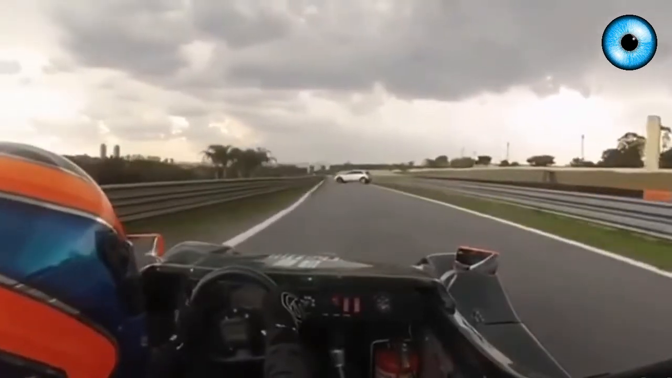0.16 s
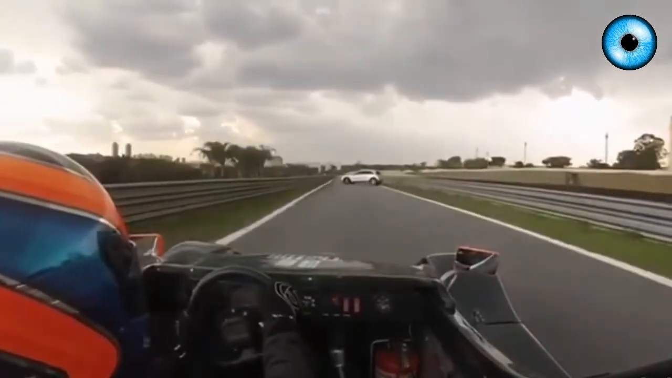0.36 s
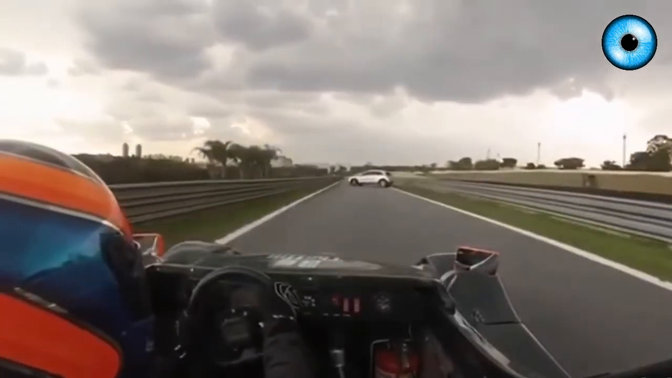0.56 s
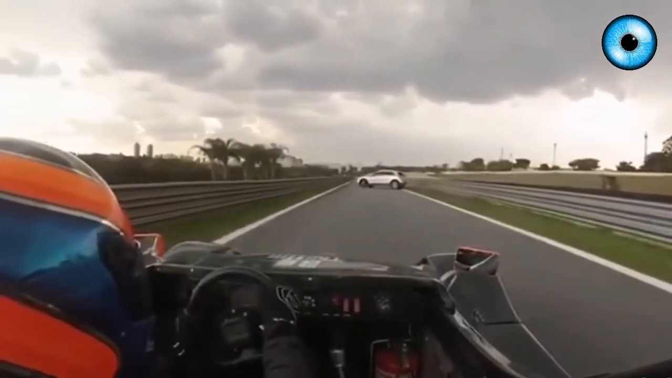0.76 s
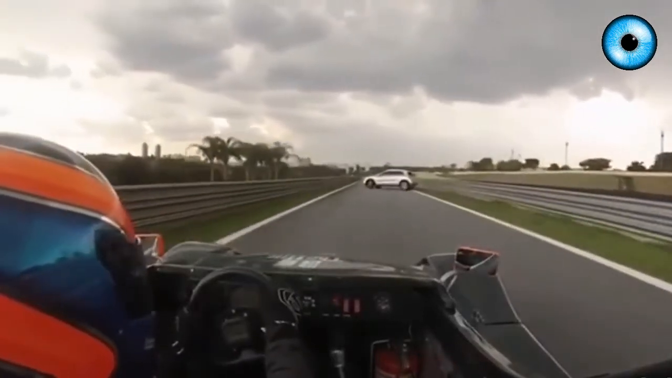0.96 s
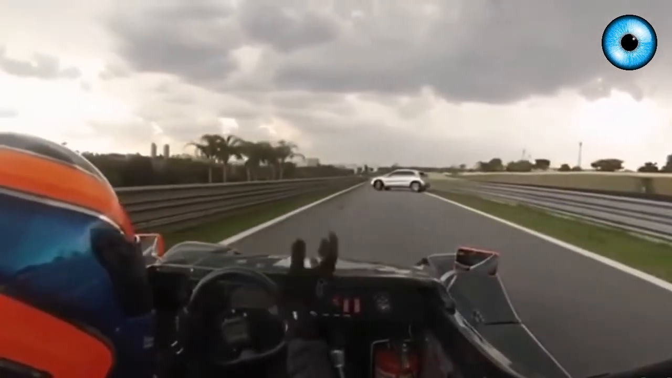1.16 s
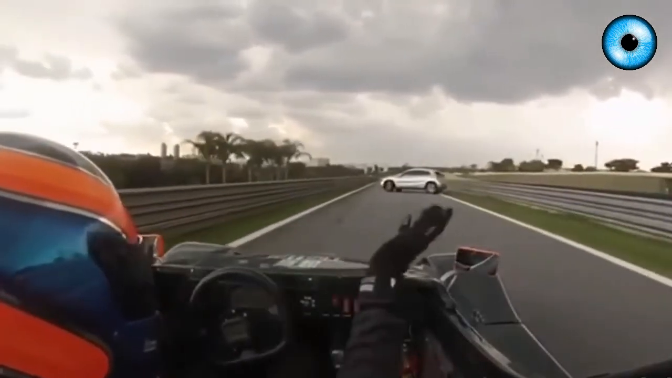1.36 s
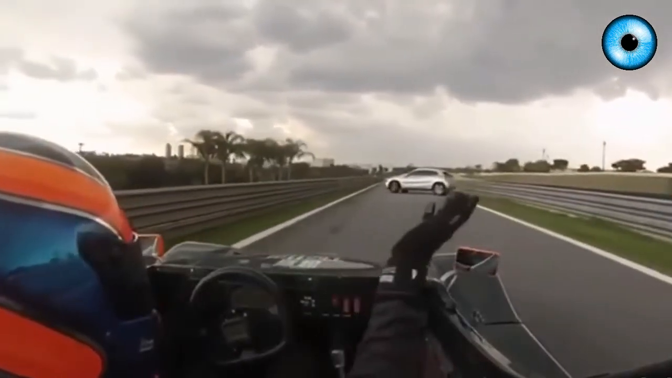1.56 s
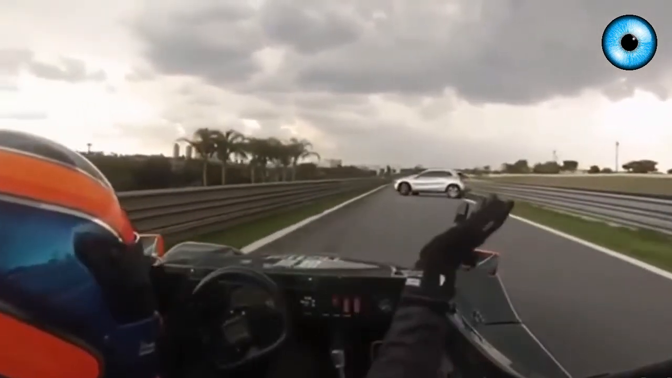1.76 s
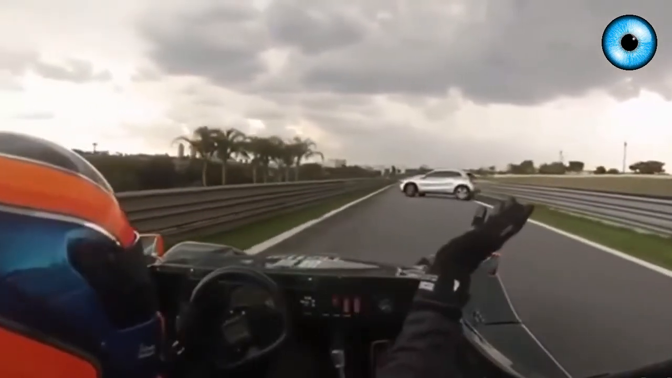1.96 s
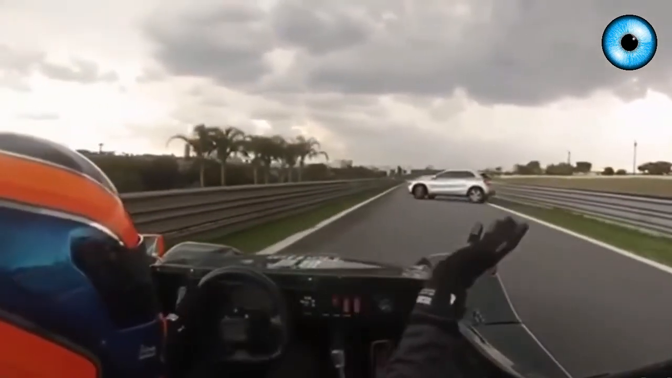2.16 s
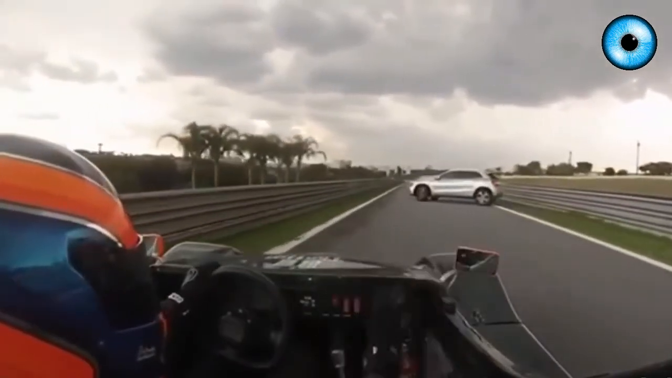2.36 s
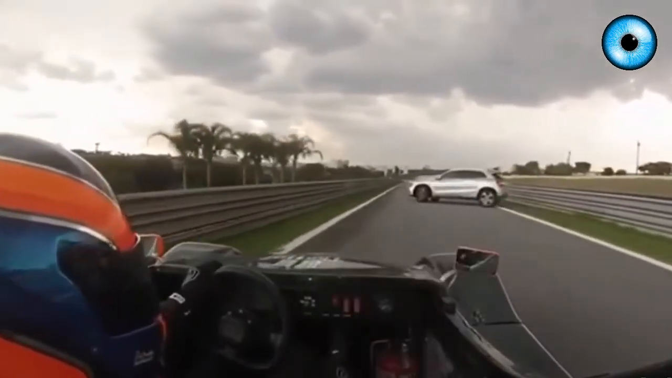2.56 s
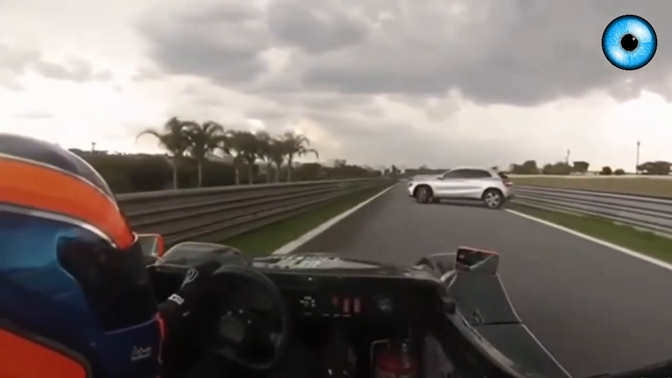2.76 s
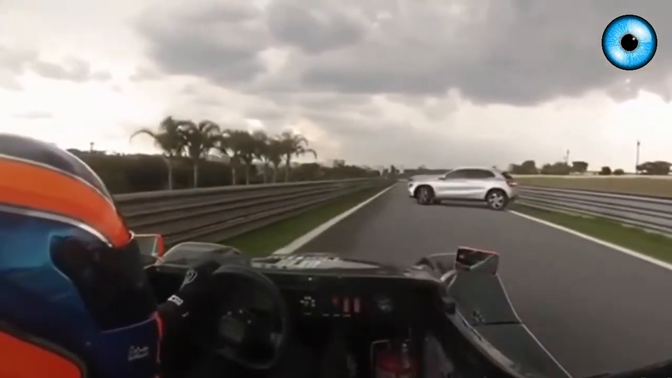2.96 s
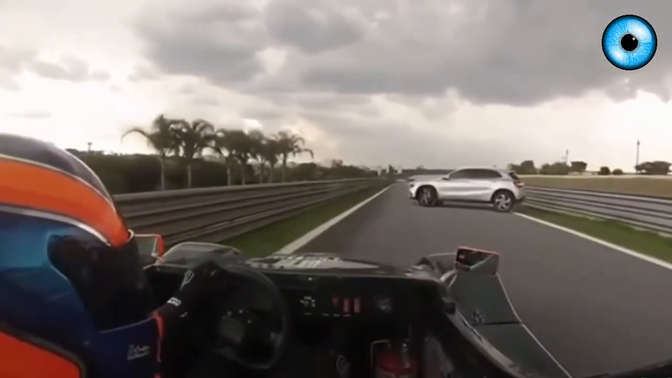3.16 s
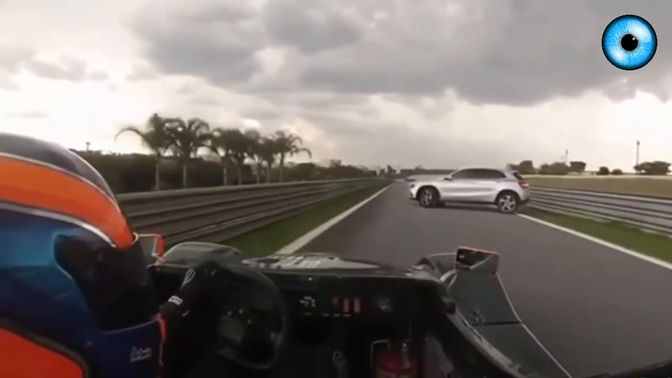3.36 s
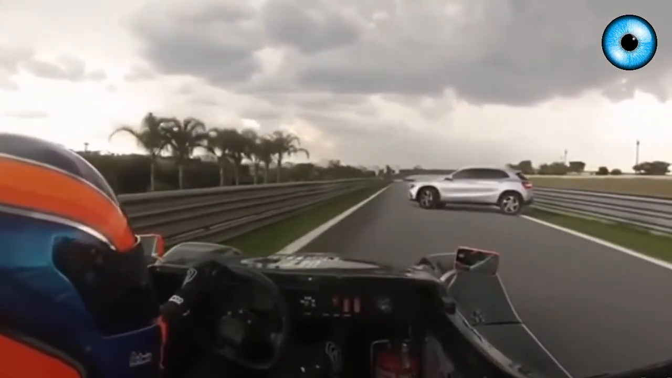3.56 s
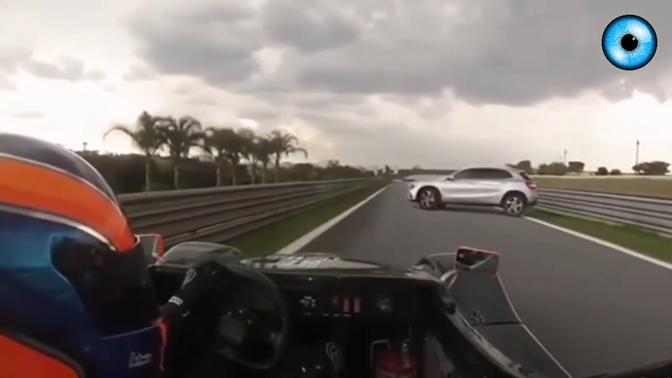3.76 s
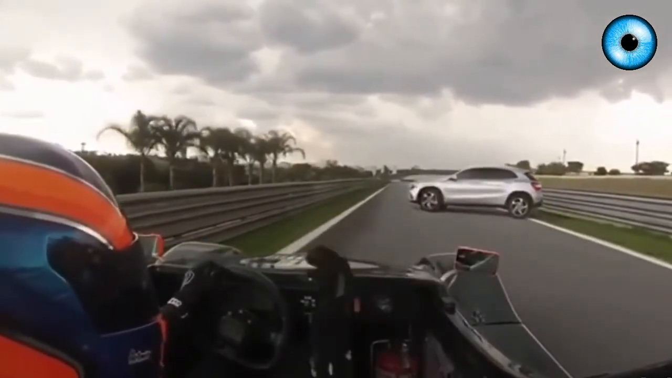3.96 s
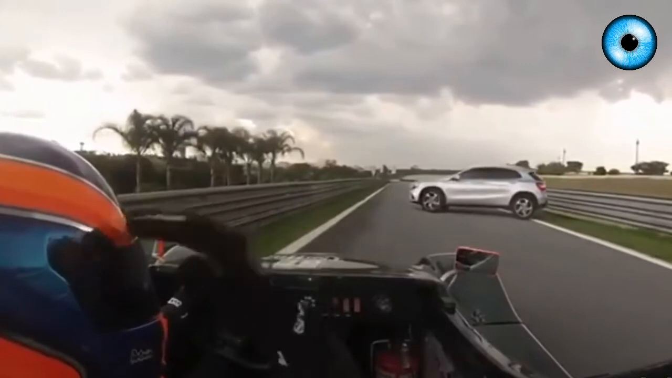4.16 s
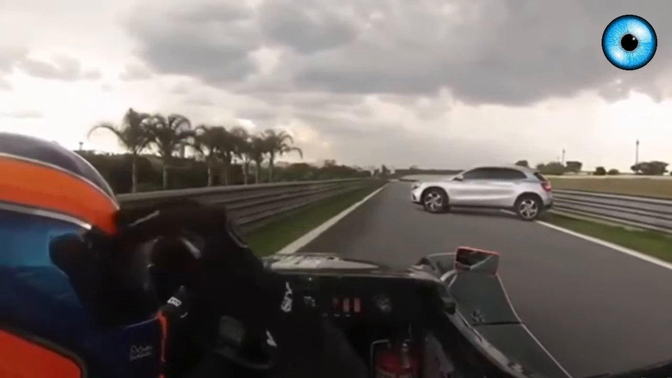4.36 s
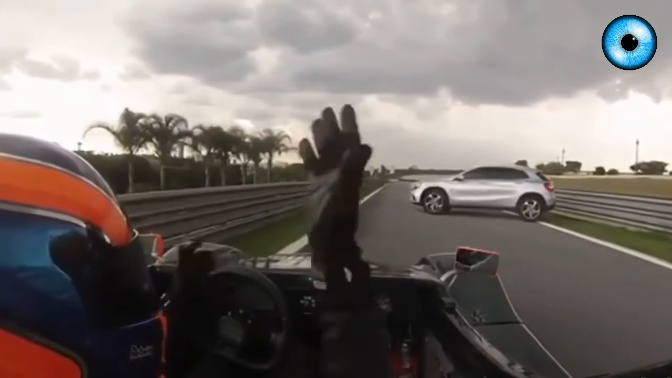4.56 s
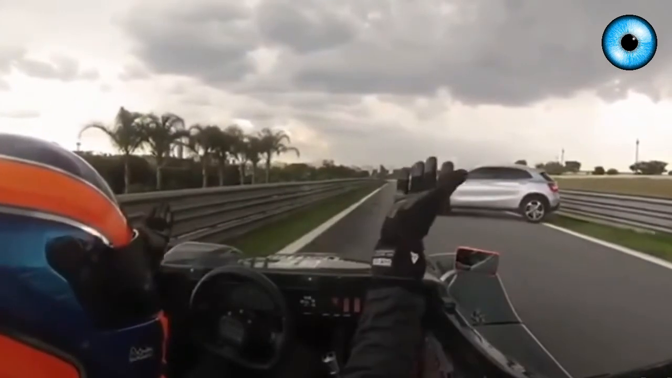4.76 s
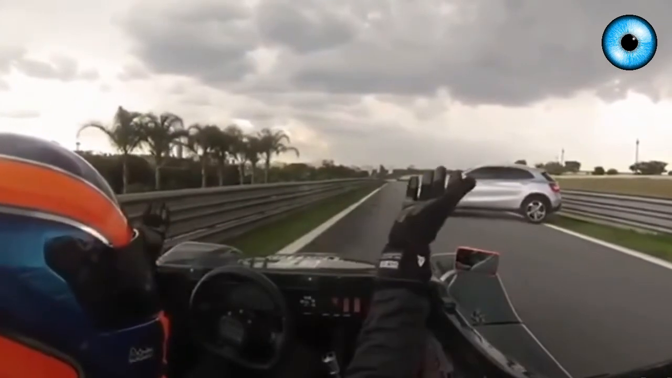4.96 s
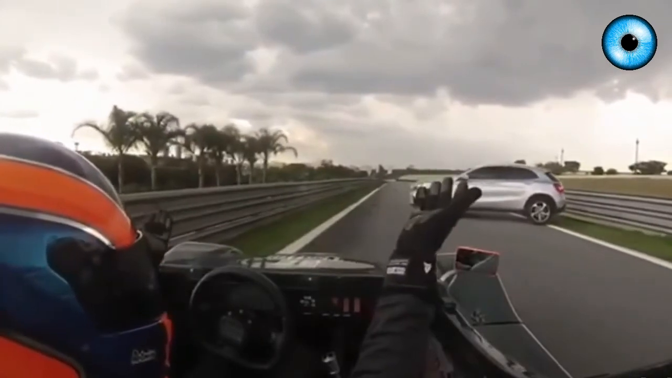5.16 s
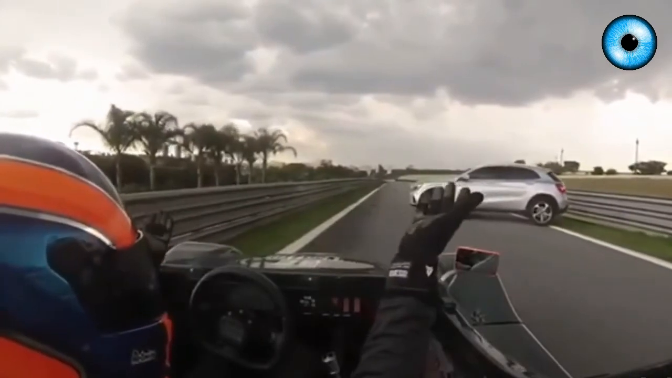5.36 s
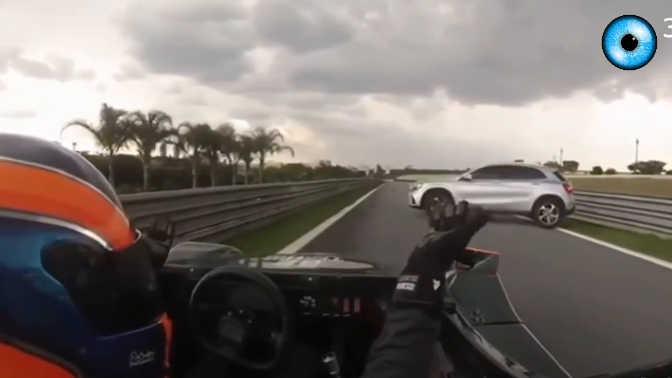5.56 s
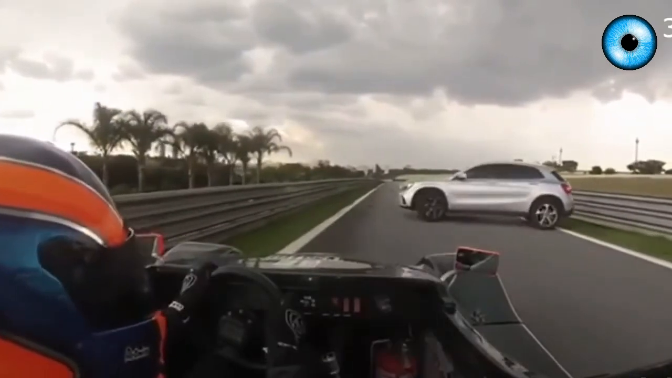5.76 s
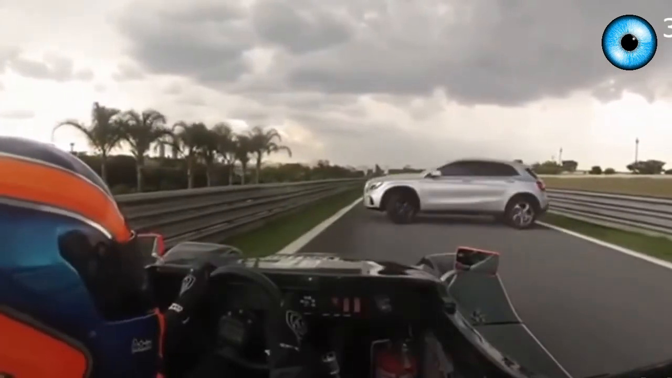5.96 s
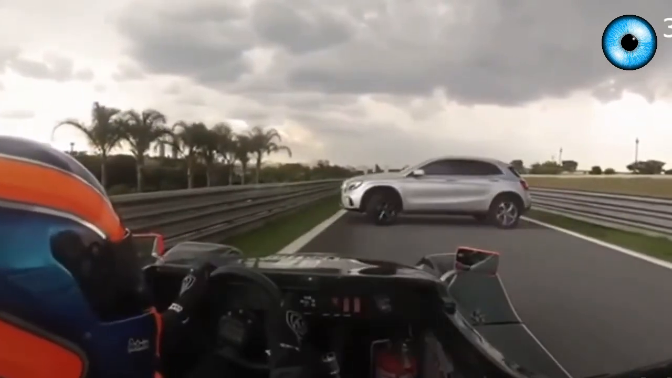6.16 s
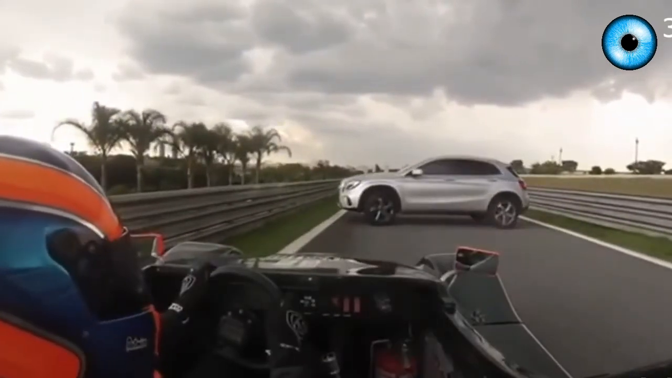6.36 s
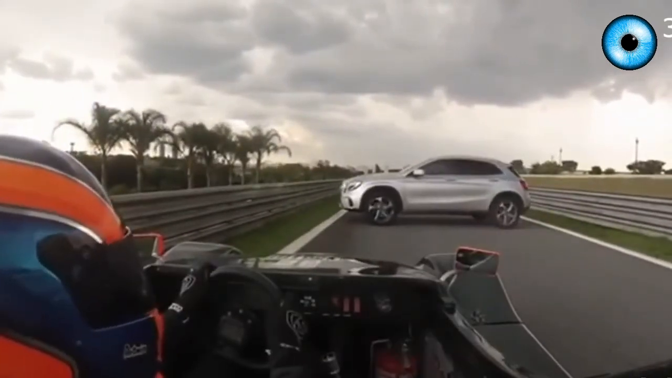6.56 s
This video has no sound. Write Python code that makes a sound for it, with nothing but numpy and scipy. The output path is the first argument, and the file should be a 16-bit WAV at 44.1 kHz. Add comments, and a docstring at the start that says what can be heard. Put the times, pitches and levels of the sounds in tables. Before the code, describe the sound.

The sound is close and dry, inside an open race car cockpit with hard panels giving a brief bright reflection. At 0 s a four-cylinder engine drones at about 94 firings per second, with harsh gear rattle, high fluttering sizzle, tyre roar and low buffeting air. The pitch slides down, booming on the way, and near 1 s the metallic rattle abruptly eases as the drive is unloaded. By 1.6 s it reaches a lumpy idle of around 35 firings per second, which wavers slightly to the end at 6.6 s. Valves tick, the block rings and panels drum. Dry clacks come at 1.4, 1.7 and 2.2 s, with a soft low bump near 1.85 s. Hard knocks cluster from 3.0 to 3.6 s, another at 4.0 s. Road and wind noise fade by about 4 s; light clacks return at 5.5 and 6.0 s over steady faint hiss.

```python
"""In the cockpit of an open race car, which slows on a closed throttle and then rolls along at idle.
The four-cylinder exhaust is a set of sine tones that boom and sink as the revs fall. Valves, block, bodywork
and gears are trains of small blows that make metal ring; the gears rattle hardest until the drive is
unloaded near 1 s. The chassis clacks and knocks now and then, in short jolts sent through the same kind of
resonances. Shaped noise makes the tyre roar, the sizzle, the buffeting air and the steady hiss."""
import sys
import numpy as np
from scipy import signal
from scipy.fft import rfft, irfft
from scipy.io import wavfile

SR = 44100
rng = np.random.default_rng(int(sys.argv[2]) if len(sys.argv) > 2 else 0)


def waveform_to_disk(signal):
    """Save audio, clipped to [-1, 1], as 16-bit WAV at the path in sys.argv[1]."""
    frames = np.transpose(np.atleast_2d(signal))
    scaled = np.clip(frames, -1, 1) * 32767
    samples = np.round(scaled).astype(np.int16)
    wavfile.write(sys.argv[1], SR, samples)


N = 290619
TIME = np.arange(N) / SR  # seconds

# The revs fall, then hunt around idle: t/s, firing rate/Hz
FIRING_RATE = [(0.0, 94.4), (0.59, 75.4), (0.88, 61.3), (1.56, 35.1), (1.69, 35), (1.89, 35), (2.22, 37.4),
               (2.88, 37.5), (3.01, 38.7), (3.78, 33), (4.2, 37.6), (4.68, 36.8), (5.69, 37.3),
               (6.04, 34.5), (6.26, 32), (6.59, 35.7)]
IDLE_RATE, TOP_RATE = 36, 91  # firings per second that count as revs 0 and 1
# The wheels drive the engine until the clutch opens: when, and how long that takes
CLUTCH_S, CLUTCH_TAKES_S = 0.96, 0.026
# Road speed reaches zero at this time; a power under 1 brakes harder towards the end
CRAWL_S, BRAKE_POWER = 3.95, 0.82

# The firing tone swells where its rate meets a resonance: f/Hz, half width/Hz, level/dB
BOOM_MODES = [(94.7, 13, -20), (56.8, 2.5, -20.5), (50.35, 3.2, -13.5)]
# Weak exhaust tones: multiple of the firing rate, level/dB against the drumming body
EXHAUST_ORDERS = [(.5, -15.5), (0.749, -17.5), (1.25, -16.5), (1.5, -16), (2, -14), (3.002, -22.5),
                  (4.001, -14.5)]
# Strength of each cylinder through one engine cycle: level/dB
CYLINDER_DB = [-9, -7, 4.8, 11.5]
# Strength of each valve through one engine cycle, used for body and gear blows too: level/dB
VALVE_DB = [0, 3.5, 3, -5, 4.5, -1.3, 4, 2]
VALVE_CHATTER = 0.65  # loose chatter against the clean snap

# Resonances of the engine block: f/Hz, width/Hz, level/dB
BLOCK_MODES = [(635.4, 24, -12.5), (962, 170, -13.5), (1074, 48.6, 6), (1203, 86, -4.5)]
# Resonances of the bodywork: f/Hz, width/Hz, level/dB
BODY_MODES = [(130, 120, -20), (223.5, 41.5, 0), (292.8, 48.2, 4), (368, 35, -6)]
# Where the drumming body's level is set: lowest f/Hz, highest f/Hz
DRUM_BAND = (190, 420)
# Resonances of the gearbox: f/Hz, width/Hz, level/dB
GEARBOX_MODES = [(655, 60, -9.5), (870, 200, -18.5), (1027, 237, -3.5), (1388, 66, 5.5), (1644, 176, 6),
                 (1685, 97, 12.5), (1820, 66, -2), (2298, 134, 2.5), (2536, 125, 0.5), (2825, 66, -1),
                 (2660, 1000, -13.5), (3210, 92, -15), (3626, 230, -14), (4100, 61, -10), (4710, 350, -22),
                 (5430, 67, -34), (6200, 230, -40), (8000, 3000, -48.5), (10300, 780, -67.5)]
# Where the gear rattle's level is set: lowest f/Hz, highest f/Hz
RATTLE_BAND = (2150, 2700)
# Resonances of the cylinder head: f/Hz, width/Hz, level/dB
HEAD_MODES = [(775, 69, -7), (1076, 214, -1.5), (1367, 100, -4.5), (1577, 150, -3.5), (1773, 93, 3),
              (2811, 54, -8), (3170, 67, -13.5), (3420, 190, -22), (5250, 130, -28.5)]

# Chassis knocks: t/s, gearbox level/dB, bodywork level/dB, fittings level/dB
KNOCKS = [(1.846, -44, -26, -60), (2.99, -30.5, -45, -50), (3.06, -24, -23, -46), (3.087, -29, -27.5, -52),
          (3.192, -29.5, -39, -35.5), (3.212, -30.5, -40, -44), (3.405, -39, -50, -38),
          (3.6, -28, -36, -48), (3.613, -28.5, -31, -38.5), (3.995, -32, -47, -39)]
KNOCK_DECAY_S = 0.0049
# A heavier knock scrapes longer: the decay above holds at this body level and doubles every so many dB
KNOCK_WEIGHT_DB, DOUBLING_DB = -37.5, 15.5
# Dry clacks of play in the gears: t/s, level/dB
CLACKS = [(1.408, -23.5), (1.688, -18), (1.752, -26), (2.246, -19.5), (5.524, -24.5), (5.581, -25),
          (6.023, -23)]
CLACK_DECAY_S = 0.002
# How much of a clack reaches gearbox, bodywork and fittings: level/dB
CLACK_PATHS_DB = (-6.5, -13, -30)
# Resonances of loose metal fittings: f/Hz, width/Hz, level/dB
FITTING_MODES = [(2880, 130, 15), (3460, 150, 16), (4910, 870, -6), (7730, 3100, -39)]
# Hollow clunk of the tub, struck along with the gearbox: f/Hz, width/Hz, level/dB
TUB_MODES = [(630, 160, -5), (840, 270, -1), (1130, 250, 5.5)]
CLUNK_DB = -4
# One soft low bump: t/s, f/Hz, length/s, level/dB
BUMP = (1.85, 50, .025, -18.5)

# Tyres rolling on tarmac, heard through the tub: f/Hz, width/Hz, level/dB
ROAD_MODES = [(624, 74, 0.5), (836, 162, -2), (2410, 390, -5.5), (5218, 83, -14.5)]
# High sizzle of the fast drivetrain: f/Hz, width/Hz, level/dB
SIZZLE_MODES = [(3416, 570, 3), (5970, 1300, -12.5), (7900, 660, -22.5), (10700, 340, -24.5)]
# The sizzle is stronger at first: until t/s, dying over t/s, extra level/dB
SIZZLE_SURGE = (0.34, .08, 5.6)
# Spectrum of the buffeting air: f/Hz, relative level per Hz/dB
BUFFET_SPECTRUM = [(18, -46.5), (38, -1.5), (52, 6), (75, -7), (120, -14), (200, -23), (450, -51),
                   (1000, -76.5)]
# Spectrum of the steady hiss: f/Hz, relative level per Hz/dB
HISS_SPECTRUM = [(800, -12), (2000, 1), (3700, 5.5), (4300, -7.5), (4650, 0), (5200, -7.5), (5750, -22),
                 (6100, -12), (6340, 3), (6600, -15), (8000, -17.5), (10200, -21.5), (10750, -15.5),
                 (12000, -47.5), (15000, -61.5)]
HISS_FLUTTER_DB = 1.8
EDGE_HZ = 15100  # the treble is cut above this


def exhaust(turns):
    """The firing tone booms as it falls through resonances; unequal cylinders add weak tones around it."""
    rate = curve(FIRING_RATE)
    boom = sum(amp(db) * np.exp(-((rate - hz) / width) ** 2) for hz, width, db in BOOM_MODES)
    loudness = (level(idle_db=-35, revs_db=11.5, speed_db=3.5) + boom) * amp(0.5 * drift(24))
    firing_tone = loudness * np.sin(2 * np.pi * turns)
    orders = sum(amp(db) * np.sin(2 * np.pi * (order * turns + rng.random())) for order, db in EXHAUST_ORDERS)
    return np.sqrt(2) * (firing_tone + drumming() * orders)


def block(turns):
    """Each firing strikes the engine block and makes it ring."""
    firings = blows(turns, CYLINDER_DB, spread_db=1.64, scatter_s=0.0004, decay_s=0.096, loose=1.73)
    return level(idle_db=-39.5, load_db=11, speed_db=-2.0) * ring(firings, BLOCK_MODES)


def bodywork(turns):
    """The body panels drum, shaken at twice the firing rate."""
    shakes = blows(2 * turns, VALVE_DB, spread_db=2.46, scatter_s=0.00086, decay_s=0.02, loose=1.23)
    return drumming() * ring(shakes, BODY_MODES, DRUM_BAND)


def gears(turns):
    """Teeth slap across their play as the crank speeds and slows, in uneven bursts; hardest under load."""
    slaps = blows(2 * turns + 0.37, VALVE_DB, spread_db=3.5, scatter_s=0.000871, decay_s=0.018, loose=3.7)
    force = level(idle_db=-53.5, revs_db=9.5, load_db=7.5, speed_db=10.5)
    bursts = amp(0.53 * drift(52))
    return force * bursts * ring(slaps, GEARBOX_MODES, RATTLE_BAND)


def valves(turns):
    """Eight valves snap shut in each engine cycle and ring the cylinder head."""
    snaps = blows(2 * turns - 0.25, VALVE_DB, spread_db=2.0, scatter_s=0.0003, decay_s=0.004,
                  loose=VALVE_CHATTER)
    return level(idle_db=-40.5, revs_db=8.5, load_db=4.5, speed_db=-2.0) * ring(snaps, HEAD_MODES)


def chassis():
    """Clacks and knocks shake gearbox, body and fittings; knocks also clunk the tub; one bump is only bass."""
    knocks = np.zeros((3, N))
    for s, gearbox_db, body_db, fittings_db in KNOCKS:
        decay_s = KNOCK_DECAY_S * 2 ** ((body_db - KNOCK_WEIGHT_DB) / DOUBLING_DB)
        knocks += np.outer(amp([gearbox_db, body_db, fittings_db]), jolt(s, decay_s, crack=0.47))
    clacks = sum(amp(db) * jolt(s, CLACK_DECAY_S, crack=0.63) for s, db in CLACKS)
    gearbox, body, fittings = knocks + np.outer(amp(CLACK_PATHS_DB), clacks)
    rattles = ring(gearbox, GEARBOX_MODES) + ring(body, BODY_MODES) + ring(fittings, FITTING_MODES)
    clunk = amp(CLUNK_DB) * ring(knocks[0], TUB_MODES)
    s, hz, length_s, db = BUMP
    swell = np.exp(-((TIME - s) / length_s) ** 2)
    bump = amp(db) * swell * np.cos(2 * np.pi * hz * (TIME - s))
    return rattles + clunk + bump


def tyres():
    """Rolling tyres make a dull, uneven roar that sinks as the car loses speed."""
    roar = ring(rng.standard_normal(N), ROAD_MODES)
    return roar * level(idle_db=-54.5, speed_db=15) * amp(2.4 * drift(6.2))


def sizzle():
    """The fast drivetrain makes a fluttering high noise that fades with the revs."""
    surge_s, dying_s, surge_db = SIZZLE_SURGE
    surge = amp(surge_db * until(surge_s, dying_s) + 1.3 * drift(35))
    return ring(rng.standard_normal(N), SIZZLE_MODES) * level(idle_db=-65.5, revs_db=26) * surge


def buffeting():
    """Air tumbling into the open cockpit makes low, wavering noise that grows with road speed."""
    return noise(BUFFET_SPECTRUM) * level(idle_db=-39.5, speed_db=14.0) * amp(0.77 * drift(5.5))


def hiss():
    """A noise with a fixed spectrum and a slight flutter stays behind everything."""
    return noise(HISS_SPECTRUM) * amp(-59.0 + HISS_FLUTTER_DB * drift(22))


def cockpit(x, decay_s=0.0041, echo_db=-7):
    """The small hard panels throw only the treble back, in a brief cluster of echoes."""
    t = TIME[:SR // 25]
    echoes = rng.standard_normal(len(t)) * np.exp(-t / decay_s / 2) * (t > 0.001)
    echoes /= np.linalg.norm(echoes)
    treble_only = signal.butter(4, 3600, "high", fs=SR, output="sos")
    echoes = signal.sosfilt(treble_only, echoes)
    return x + amp(echo_db) * signal.oaconvolve(x, echoes)[:N]


def level(idle_db, revs_db=0, load_db=0, speed_db=0):
    """A part's gain: its level at idle plus what full revs, a loaded drive and full road speed each add."""
    revs = (curve(FIRING_RATE) - IDLE_RATE) / (TOP_RATE - IDLE_RATE)
    load = until(CLUTCH_S, CLUTCH_TAKES_S)
    speed = np.maximum(1 - TIME / CRAWL_S, 0) ** BRAKE_POWER
    return amp(idle_db + revs_db * revs + load_db * load + speed_db * speed)


def drumming():
    """How hard the bodywork shakes: more with revs and road speed."""
    return level(idle_db=-40.5, revs_db=9.0, speed_db=6.5)


def blows(turns, pattern_db, spread_db, scatter_s, decay_s, loose):
    """One sharp blow per turn, each part a little early or late, followed by loose chatter."""
    at = np.flatnonzero(np.diff(np.floor(turns)) > 0)  # samples where a new turn begins
    part = np.arange(len(at)) % len(pattern_db)
    lateness = rng.standard_normal(len(pattern_db))[part]  # each part keeps its own
    slip, force = rng.standard_normal((2000, 2))[:len(at)].T  # these differ at every blow
    shift = np.round((lateness + 0.6 * slip) * scatter_s * SR).astype(int)
    at = np.clip(at + shift, 0, N - 1)
    strength = amp(np.take(pattern_db, part) + spread_db * force)
    clicks = np.zeros(N)
    clicks[at] = strength / np.sqrt(np.gradient(turns)[at])  # keeps the power even as the rate changes
    # The power of the chatter dies away after each click
    shaking = np.sqrt(signal.lfilter([1], [1, -np.exp(-1 / (decay_s * SR))], clicks ** 2))
    chatter = unit(shaking * rng.standard_normal(N))
    return unit(unit(clicks) + loose * chatter)


def jolt(s, decay_s, crack):
    """A sharp blow at the given time, followed by a short scrape."""
    scrape = np.exp(-TIME[:SR // 8] / decay_s / 2) * rng.standard_normal(SR // 8)
    scrape[0] = crack * np.linalg.norm(scrape)
    return np.pad(scrape, (round(s * SR), N))[:N]


def ring(x, modes, band=(0, SR), size=8192):
    """Sends x through steep resonances, scaled so that white noise keeps its power inside the band."""
    hz = abs(np.fft.fftfreq(size, 1 / SR))
    power = sum(amp(db) ** 2 / (1 + ((hz - f) / (0.8 * width)) ** 2) ** 2.5 for f, width, db in modes)
    bass = (hz / modes[0][0]) ** 4
    power = power * bass / (0.1 + bass) + 1e-12  # little radiates below the first mode
    power /= np.mean(power * (hz >= band[0]) * (hz <= band[1]))
    # Minimum phase: the ringing starts with the blow, never before it
    spectrum = np.exp(np.conj(signal.hilbert(np.log(power) / 2)))
    response = np.fft.ifft(spectrum).real
    return signal.oaconvolve(x, response[:size // 2])[:N]


def noise(points):
    """Noise of size 1 with the given spectrum."""
    hz, db = np.transpose(points)
    shape_db = np.interp(np.log(np.fft.rfftfreq(N, 1 / SR) + 1), np.log(hz), db)
    return unit(irfft(rfft(rng.standard_normal(N)) * amp(shape_db), N))


def drift(hz):
    """Slow random wandering of size 1, up to about the given rate."""
    slowness = 1 + (np.fft.rfftfreq(N, 1 / SR) / hz) ** 4
    return unit(irfft(rfft(rng.standard_normal(N)) / slowness, N))


def until(s, takes_s):
    """1 before the given time, 0 after it, with a short ramp between."""
    return np.clip(0.5 + (s - TIME) / takes_s, 0, 1)


def curve(rows):
    """Joins the (time, value) rows of a table by straight lines."""
    return np.interp(TIME, *np.transpose(rows))


def unit(x):
    """Scales a signal to size 1 (root mean square)."""
    return x / np.sqrt(np.mean(x ** 2) + 1e-20)


def amp(db):
    """Turns decibels into a plain factor."""
    return 10 ** (np.asarray(db) / 20)


def scene():
    """One slightly unsteady crank drives every part of the engine."""
    unsteadiness = 1 + 0.00623 * drift(10.84)
    turns = np.cumsum(curve(FIRING_RATE) * unsteadiness) / SR  # counts the firings so far
    engine = exhaust(turns) + block(turns) + bodywork(turns) + gears(turns) + valves(turns)
    background = tyres() + sizzle() + buffeting() + hiss()
    return cockpit(engine + chassis() + background)[None]


def record(dry):
    """A steep filter removes the highest treble."""
    lowpass = signal.firwin(511, EDGE_HZ, window=("kaiser", 9), fs=SR)
    return signal.oaconvolve(dry, lowpass[None], "same")


dry = scene()
out = record(dry)
waveform_to_disk(out)
```